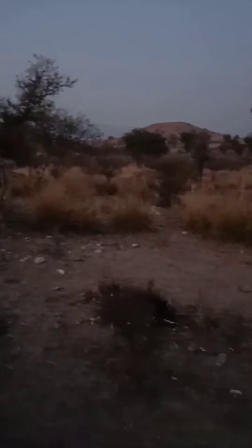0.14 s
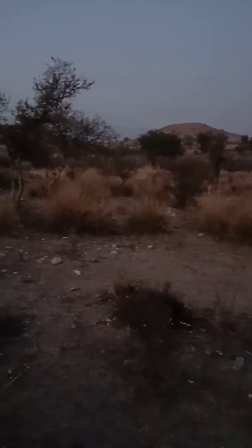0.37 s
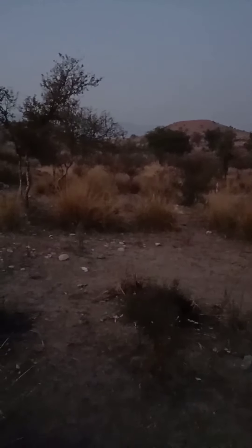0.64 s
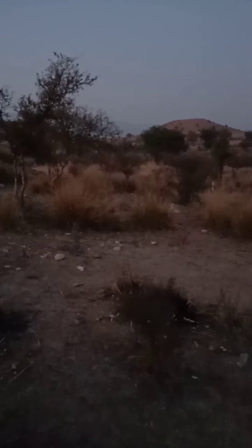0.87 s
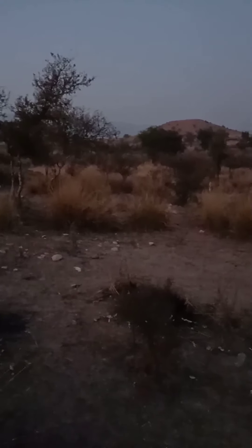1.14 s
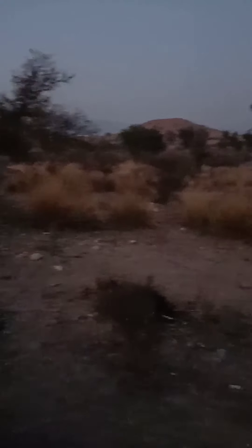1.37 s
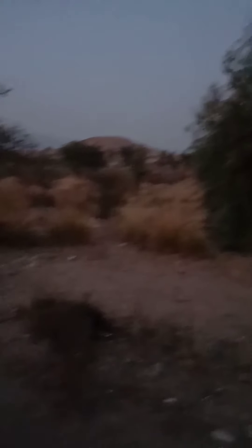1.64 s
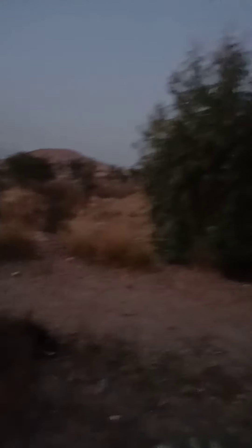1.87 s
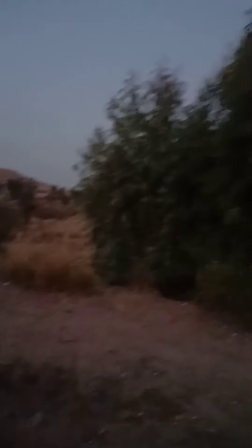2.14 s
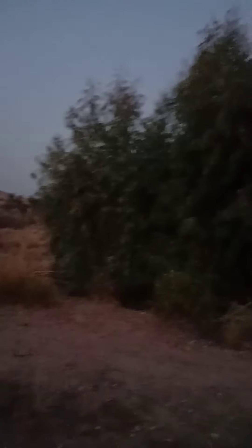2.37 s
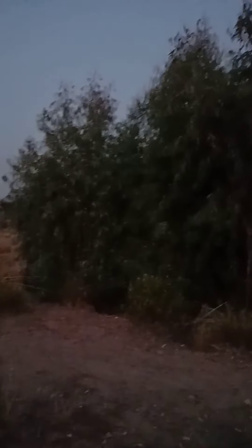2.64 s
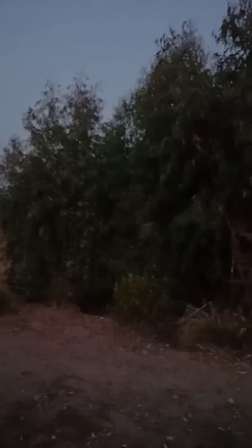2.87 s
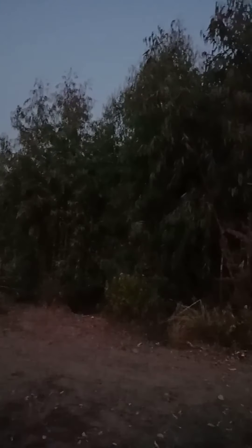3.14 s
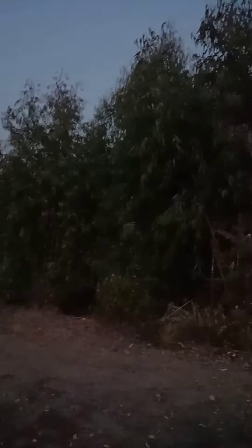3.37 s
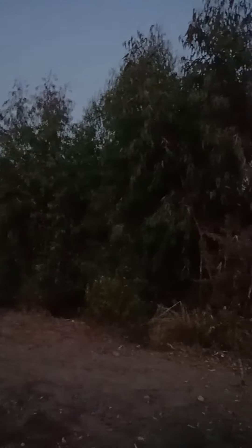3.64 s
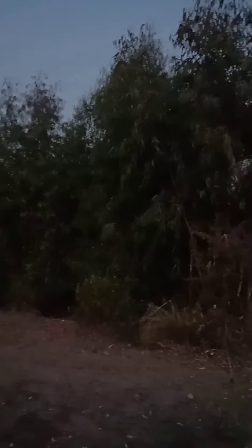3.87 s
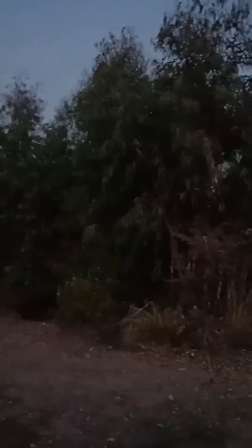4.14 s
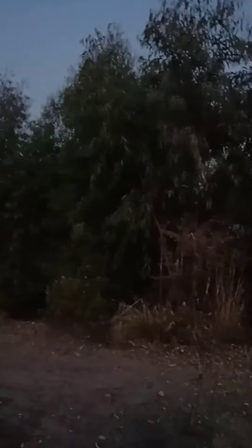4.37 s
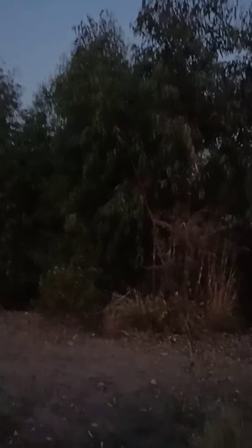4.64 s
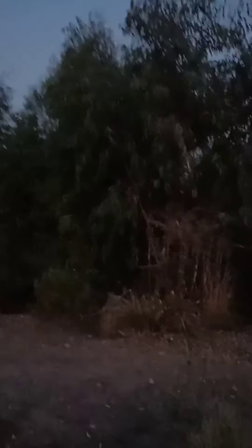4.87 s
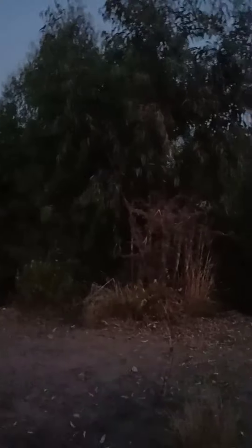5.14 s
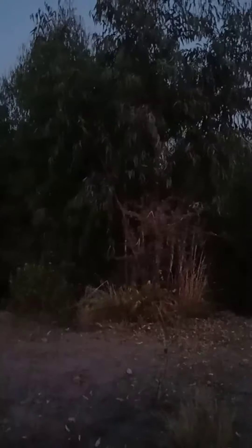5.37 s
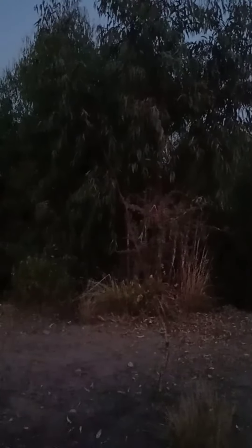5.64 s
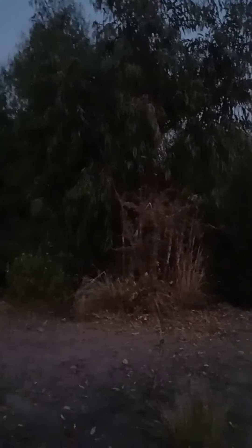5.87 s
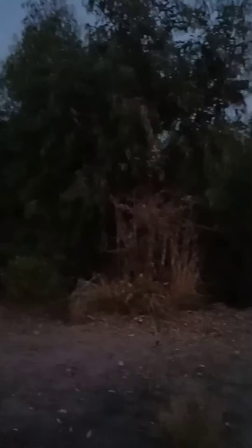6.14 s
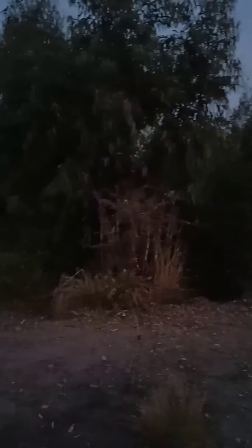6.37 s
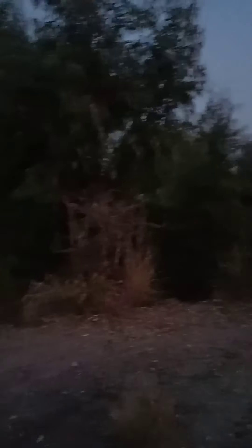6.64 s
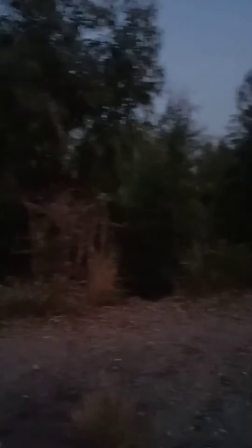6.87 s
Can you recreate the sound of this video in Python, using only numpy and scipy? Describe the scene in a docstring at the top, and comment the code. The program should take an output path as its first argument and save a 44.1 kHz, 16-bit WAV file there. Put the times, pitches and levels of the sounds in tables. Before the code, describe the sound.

A flock of small birds settles to roost in dense trees at dusk, all calling at once. From 0 to 1 second the chorus is lighter: a quick bright chirp near 0.3, a few short whistles, then a cluster around 0.9. From about 1.1 it thickens, with strong close notes around 1.8 and continuous overlapping chatter through 2 to 3.5 seconds. It is fullest from roughly 3.6 to 5, with sharp near chirps at 4.3 and 4.9 and more low raspy calls. After 5 it stays dense but slightly softer, with a last tight cluster of chirps near 6.7, ending mid-chorus at 7. Calls last only hundredths of a second, mostly gliding, slightly rough, mid-high to high pitched, smeared by short leaf echoes. A faint fuzzy tone, very quiet low air, early hand rustle and soft bumps near 1.5, 2.9 and 6.8 lie underneath.

```python
"""A flock of small birds gathers to roost in dense trees at dusk and calls all at once.
Near birds: listed gliding tones with rough overtones. Crowd: random chatter, cheeps and low rasps,
held to level curves. Foliage: sparse decaying echoes smear every call.
Below lie a faint drone (noise-modulated tone), still air and hand rustle (filtered noise), and
handling bumps (decaying low sines)."""
import sys
import numpy as np
from scipy import signal
from scipy.fft import rfft, irfft
from scipy.io import wavfile
from scipy.ndimage import uniform_filter1d

SR = 44100
rng = np.random.default_rng(int(sys.argv[2]) if len(sys.argv) > 2 else 0)


def gain_from_db(level_db):
    """Convert decibel levels to linear amplitude factors (20 dB per decade)."""
    decades = np.asarray(level_db, float) / 20
    return 10 ** decades


def waveform_to_disk(signal):
    """Save audio, clipped to [-1, 1], as 16-bit WAV at the path in sys.argv[1]."""
    frames = np.transpose(np.atleast_2d(signal))
    scaled = np.clip(frames, -1, 1) * 32767
    samples = np.round(scaled).astype(np.int16)
    wavfile.write(sys.argv[1], SR, samples)


N = 309141  # samples
TREES = 6  # each tree scatters sound its own way


def evened(x):
    """Scales to rms 1."""
    return x / np.sqrt(np.mean(x ** 2) + 1e-20)


def add(mix, start_s, sound):
    """Mixes a sound in at start_s, cut at the end of the mix."""
    part = mix[int(start_s * SR):][:len(sound)]
    part += sound[:len(part)]


def coloured(x, points):
    """Filters by a spectrum of (freq_hz, level_db) points, straight on a log-frequency axis."""
    freq_hz, level_db = np.transpose(points)
    bins_hz = np.fft.rfftfreq(len(x), 1 / SR)
    gain = gain_from_db(np.interp(np.log(bins_hz + 1), np.log(freq_hz), level_db))
    return irfft(rfft(x) * gain, len(x))


def wander(period_s):
    """Smoothed noise of rms 1 that changes over about period_s."""
    size = max(int(period_s * SR), 1)
    once = uniform_filter1d(rng.standard_normal(N), size)
    return evened(uniform_filter1d(once, size))


def loudness(table):
    """A (time_s, level_db) curve at every sample."""
    time_s, level_db = np.transpose(table)
    return np.interp(np.arange(N) / SR, time_s, level_db)


def bouts(table, rise_db_per_s, fall_db_per_s, floor_db):
    """Level in dB at every sample: each bout rises, holds and falls; bouts and floor add as power."""
    t = np.arange(0, N, 64)[:, None] / SR
    start_s, length_s, level_db = np.transpose(table)
    before_s = np.maximum(start_s - t, 0)
    after_s = np.maximum(t - start_s - length_s, 0)
    shape_db = level_db - rise_db_per_s * before_s - fall_db_per_s * after_s
    bout_power = (gain_from_db(shape_db) ** 2).sum(axis=1)
    power = np.interp(np.arange(N) / SR, t[:, 0], bout_power)
    return 10 * np.log10(power + gain_from_db(floor_db) ** 2)


def note(hz, flutter, rough, overtone_db, edge):
    """A syrinx tone along the pitch curve hz; flutter shakes its level, most of all in two overtones."""
    phase = 2 * np.pi * np.cumsum(hz) / SR
    second = gain_from_db(overtone_db) * np.sin(2 * phase)
    third = gain_from_db(1.453 * overtone_db) * np.sin(3 * phase)
    fundamental = np.sin(phase) * (1 + rough * flutter)
    tone = fundamental + (second + third) * (.35 + .95 * flutter[::-1])
    return tone * signal.windows.tukey(len(hz), np.clip(edge, 0, 1))


def foliage(x, t60_s, wet_db):
    """Direct sound plus leaf and trunk scatter: per tree (row), sparse decaying taps of random sign."""
    size = SR // 2
    at = np.arange(100, size - 20, 20)
    at = at + rng.integers(0, 20, (TREES, len(at)))
    taps = np.zeros((TREES, size))
    np.put_along_axis(taps, at, rng.choice([-1., 1.], at.shape), axis=1)
    taps *= gain_from_db(-60 * np.arange(size) / SR / t60_s)
    taps /= np.linalg.norm(taps[0])
    scatter = signal.oaconvolve(x, taps, axes=1)[:, :x.shape[1]]
    return (x + gain_from_db(wet_db) * scatter).sum(axis=0)


# nearest notes, level before waver and scatter: start_s, length_s, start_hz, end_hz, level_db
NEAR_NOTES = [(0.256, 0.054, 3225, 3700, -35.5), (0.286, 0.016, 6530, 6300, -38),
              (0.302, 0.0092, 6050, 4260, -43), (0.304, 0.028, 4090, 3360, -34),
              (0.392, 0.026, 3700, 2480, -48), (0.419, 0.034, 1810, 793, -59.5),
              (1.051, 0.035, 3720, 3590, -39.5), (0.536, 0.065, 4210, 3840, -43),
              (0.691, 0.11, 2666, 2850, -43.5), (0.774, 0.036, 6800, 3970, -40.5),
              (0.852, 0.042, 2820, 2435, -38), (0.878, 0.022, 4930, 6340, -41),
              (0.9, 0.017, 4520, 6220, -31.5), (0.915, 0.019, 5800, 3280, -38),
              (0.918, 0.031, 5800, 5570, -35.5), (0.95, 0.034, 3650, 3670, -33.5),
              (0.971, 0.036, 5440, 4400, -42), (1.109, 0.017, 5000, 6200, -38),
              (1.136, 0.035, 6500, 3800, -32), (1.199, 0.023, 4040, 2084, -41),
              (1.266, 0.095, 3390, 3274, -31.5), (1.378, 0.027, 4140, 5880, -40),
              (1.383, 0.032, 5400, 5690, -36.5), (1.422, 0.024, 6030, 4250, -32),
              (1.438, 0.032, 4260, 3830, -30), (1.536, 0.05, 5850, 6000, -36.5),
              (1.569, 0.031, 6350, 6500, -39.5), (1.575, 0.022, 3195, 2090, -37),
              (1.601, 0.026, 870, 807, -52.5), (1.699, 0.036, 3770, 5750, -37),
              (1.701, 0.056, 5460, 5140, -35.5), (1.783, 0.046, 3590, 3404, -33),
              (1.821, 0.037, 3310, 3280, -27), (1.843, 0.05, 3630, 3605, -29),
              (1.945, 0.018, 4600, 4600, -59), (1.993, 0.029, 5950, 5550, -33.5),
              (1.98, 0.014, 4000, 4570, -33.5), (2.008, 0.023, 3800, 3580, -29.5),
              (2.062, 0.02, 3700, 2400, -33.5), (2.081, 0.023, 3400, 2210, -42),
              (2.119, 0.012, 4050, 3840, -33), (2.133, 0.05, 2900, 2870, -35),
              (2.175, 0.012, 5460, 3220, -37), (2.184, 0.035, 3100, 2955, -29),
              (2.222, 0.037, 3020, 2444, -31), (2.267, 0.038, 2100, 1390, -43),
              (2.364, 0.019, 3800, 6500, -42), (2.398, 0.037, 2790, 2360, -37.5),
              (2.399, 0.018, 5620, 2860, -32), (2.451, 0.019, 2820, 2850, -29.5),
              (2.468, 0.077, 2580, 2890, -36), (2.586, 0.042, 3205, 3137, -29),
              (2.616, 0.092, 3550, 3196, -30), (2.696, 0.023, 4020, 3900, -42),
              (2.703, 0.056, 2252, 1945, -36), (2.722, 0.074, 3300, 3540, -36.5),
              (2.796, 0.028, 4060, 3650, -31.5), (2.87, 0.063, 2690, 2540, -36),
              (2.92, 0.054, 4420, 4460, -39.5), (2.944, 0.085, 2510, 2170, -42),
              (3.075, 0.011, 5000, 4500, -31.5), (3.101, 0.0098, 4930, 4620, -33.5),
              (3.086, 0.055, 3610, 3770, -32.5), (3.142, 0.034, 4390, 4120, -32),
              (3.175, 0.029, 1776, 770, -62), (3.347, 0.035, 5500, 5540, -39),
              (3.371, 0.1, 3180, 3120, -33.5), (3.477, 0.021, 1726, 945, -44.5),
              (3.531, 0.084, 2920, 3010, -34.5), (3.617, 0.0094, 5770, 4100, -31),
              (3.63, 0.018, 1470, 1260, -40.5), (3.625, 0.032, 4110, 3200, -28.5),
              (3.687, 0.013, 6100, 3570, -30), (3.872, 0.072, 5600, 5500, -37.5),
              (3.891, 0.048, 3700, 3540, -32), (4.077, 0.06, 3400, 3610, -29),
              (4.132, 0.039, 3260, 3270, -35), (4.216, 0.027, 2476, 2560, -27.5),
              (4.295, 0.031, 2150, 1930, -62), (4.204, 0.063, 5150, 5450, -42),
              (4.301, 0.028, 5570, 6970, -40), (4.304, 0.031, 4190, 3820, -30.5),
              (4.317, 0.032, 3470, 3840, -25), (4.351, 0.025, 2520, 2400, -31),
              (4.354, 0.032, 3580, 3720, -38), (4.455, 0.059, 2550, 2450, -33.5),
              (4.534, 0.11, 2777, 2870, -35), (4.602, 0.042, 3430, 3620, -27),
              (4.781, 0.024, 4500, 4410, -32), (4.864, 0.015, 4180, 6400, -33.5),
              (4.877, 0.036, 6500, 5740, -37), (4.897, 0.013, 5620, 3370, -24),
              (4.898, 0.038, 4170, 3455, -29.5), (5.045, 0.054, 3330, 3160, -32),
              (5.161, 0.025, 1757, 1036, -46.5), (5.249, 0.016, 2480, 2770, -33),
              (4.654, 0.036, 2400, 2160, -37), (5.369, 0.054, 2605, 2635, -33),
              (5.396, 0.075, 2037, 1820, -43), (5.482, 0.067, 2550, 2840, -38.5),
              (5.552, 0.034, 3880, 3656, -29), (5.596, 0.028, 3760, 2820, -32),
              (5.769, 0.02, 3900, 4500, -37.5), (5.784, 0.016, 4500, 3730, -33),
              (5.794, 0.06, 2650, 2316, -36.5), (5.858, 0.084, 3116, 3260, -34),
              (6.017, 0.086, 2586, 2376, -34), (6.168, 0.018, 3695, 3365, -29.5),
              (6.218, 0.06, 2050, 1840, -39), (6.38, 0.085, 7250, 7070, -46), (6.483, 0.1, 3170, 3255, -35),
              (6.707, 0.010, 5700, 3460, -30), (6.717, 0.013, 3600, 3130, -29),
              (6.727, .008, 5070, 3600, -33), (6.735, 0.049, 2900, 3150, -31.5),
              (6.784, 0.044, 2500, 1950, -40.5), (6.876, 0.01, 4400, 3630, -35.5)]


def near_birds():
    """Notes that stand out: rough tones gliding from one pitch to another, fastest at first if wide."""
    waver_db = 3.2
    out = np.zeros((TREES, N))
    flutter, quaver = wander(0.00067), wander(0.0051)
    throb = wander(0.0043)  # slow level flutter: long notes waver in beads
    for k, (start_s, length_s, start_hz, end_hz, level_db) in enumerate(NEAR_NOTES):
        u = np.linspace(0, 1, int(length_s * SR))
        first = int(start_s * SR)
        span = slice(first, first + len(u))
        ratio = end_hz / start_hz
        steep = min(abs(np.log(ratio)) / .4, 1)  # wide sweeps are harsher than level whistles
        shake = .009 * quaver[span] + .015 * steep * flutter[span][::-1]
        hz = start_hz * ratio ** (u ** (1 - .4 * steep)) * (1 + shake)
        sound = note(hz, flutter[span], rough=0.21 + 0.05 * steep,
                     overtone_db=-24 - 12 * steep, edge=0.16)
        wavering_db = level_db + waver_db * np.clip(throb[span], -3, 1)
        add(out[k % TREES], start_s, np.sqrt(2) * gain_from_db(wavering_db) * sound)  # sqrt(2): level as sine rms
    return foliage(out, t60_s=0.15, wet_db=-6)


# overall colour of the crowd, with a dip near 8 kHz: freq_hz, level_db
CROWD_COLOUR = [(300, -70), (550, -13.5), (900, -22), (1500, -7.5), (2500, -3), (3700, 1), (4600, 1.5),
                (6000, 0), (7400, -3.5), (8100, -15), (10500, -6.5), (12500, -16.5), (13800, -21),
                (15000, -13.5)]


def crowd(count, low_hz, high_hz, length_s, fall, arch, rough, overtone_db, spread_db):
    """Many birds at chance moments: calls arch in pitch, and most fall; fall and arch are log ratios."""
    hoarse = .009  # share by which the pitch shakes
    lead = SR // 4  # samples: the flock is already calling when the scene opens
    out = np.zeros((TREES, N + SR))
    flutter = np.tile(wander(.0013), 2)
    for when, pitch, long, drop, bow, far, own in rng.random((count, 7)):
        u = np.linspace(0, 1, int(length_s * (.4 + 1.6 * long ** 2) * SR))
        arching = arch * bow * (np.sin(np.pi * u) - .5)
        falling = fall * (1.6 * drop ** 2 - .2) * (u - .5)
        shaking = flutter[int(own * N):][:len(u)]
        centre_hz = low_hz * (high_hz / low_hz) ** pitch
        hz = centre_hz * np.exp(arching - falling + hoarse * shaking[::-1])
        call = gain_from_db(-spread_db * far) * note(hz, shaking, rough, overtone_db, edge=.5)
        add(out[int(own * N) % TREES], when * (N + lead) / SR, call)
    return coloured(foliage(out, t60_s=.15, wet_db=-2)[lead:lead + N], CROWD_COLOUR)


def following(x, level_db):
    """Evens out a crowd's loudness, then sets it to a level curve."""
    power = uniform_filter1d(uniform_filter1d(x ** 2, 3000), 3000)
    return x / np.sqrt(power + 1e-12) * gain_from_db(level_db)


# far part of the roost, heard in the pauses, before each part's share: time_s, level_db
MURMUR_LEVEL = [(0, -43), (.7, -39), (1.3, -34.5), (1.65, -40.5), (2.3, -45), (2.6, -34.5), (3.2, -32),
                (4.2, -34.5), (5.2, -30), (5.7, -34.5), (6.2, -35), (7.01, -32)]


def part_level(table, rise_db_per_s, fall_db_per_s, share_db):
    """Level in dB of one part of the flock: nearer birds' bouts over its share of the murmur."""
    return bouts(table, rise_db_per_s, fall_db_per_s, loudness(MURMUR_LEVEL) + share_db)


# chatter colour, weak between about 4.5 and 6.2 kHz: freq_hz, level_db
CHATTER_COLOUR = [(3700, 0), (4300, -7), (4900, -24), (6100, -24), (6600, 0)]
# bouts of nearer chatterers: start_s, length_s, level_db
CHATTER = [(.24, 0.012, -36.5), (.38, 0.016, -34.5), (.8, 0.027, -33.5), (1.13, 0.13, -35),
           (1.46, 0.15, -30), (1.74, 0.079, -26.5), (2.02, 0.097, -32), (2.18, 0.091, -32.5),
           (2.37, 0.093, -37.5), (2.57, 0.16, -34), (2.85, 0.019, -29.5), (3.1, 0.089, -30),
           (3.42, 0.067, -27.5), (3.55, 0.32, -30), (3.94, 0.23, -27), (4.32, 0.49, -27.5),
           (4.92, 0.027, -27), (5.0, 0.37, -33), (5.52, 0.025, -31), (5.85, 0.18, -33.5),
           (6.4, 0.13, -35.5), (6.72, 0.042, -42)]


def chatter():
    """Mid-pitched calls, weak between about 4.5 and 6.2 kHz."""
    calls = crowd(count=1600, low_hz=2000, high_hz=4000, length_s=.027, fall=.65, arch=.18,
                  rough=.55, overtone_db=-17, spread_db=13)
    level_db = part_level(CHATTER, rise_db_per_s=250, fall_db_per_s=200, share_db=-0.11)
    return following(coloured(calls, CHATTER_COLOUR), level_db)


# bouts of nearer cheepers, level before the overtone change: start_s, length_s, level_db
CHEEPS = [(.11, 0.027, -49), (.3, 0.039, -38.5), (.51, 0.046, -44), (.73, 0.093, -42.5),
          (.93, 0.029, -37.5), (1.14, 0.069, -37), (1.24, 0.092, -39.5), (1.44, 0.15, -35.5),
          (1.74, 0.073, -34.5), (2.02, 0.031, -36.5), (2.18, 0.073, -40.5), (2.41, 0.014, -36),
          (2.57, 0.13, -37.5), (2.79, 0.17, -36), (3.1, 0.048, -35), (3.36, 0.31, -36.5),
          (3.62, 0.095, -33.5), (3.75, 0.11, -37.5), (3.94, 0.21, -38), (4.19, 0.032, -46),
          (4.33, 0.026, -34.5), (4.49, 0.22, -35.5), (4.83, 0.061, -39.5), (4.91, 0.0081, -32),
          (5.1, 0.19, -45), (5.28, 0.075, -37), (5.48, 0.067, -38.5), (5.75, 0.21, -39),
          (6.15, 0.045, -42.5), (6.44, 0.15, -38.5), (6.72, 0.0057, -36.5), (6.9, 0.17, -50)]


def cheeps():
    """High swept calls; loud ones are near or forceful, so overtones outgrow the fundamental."""
    calls = crowd(count=1700, low_hz=4100, high_hz=7200, length_s=.024, fall=.6, arch=.22,
                  rough=.55, overtone_db=-10, spread_db=13)
    level_db = part_level(CHEEPS, rise_db_per_s=230, fall_db_per_s=203, share_db=-14)
    calls = following(calls, level_db)
    overtones = coloured(calls, [(7600, -80), (8400, 0)])
    return calls + overtones * (gain_from_db(0.79 * (level_db + 34.5)) - 1)


# bouts of nearer raspers: start_s, length_s, level_db
RASPS = [(.24, 0.079, -54.5), (.45, 0.0045, -47), (.62, 0.035, -50.5), (.86, 0.024, -45), (1.14, 0.27, -50),
         (1.4, 0.005, -48), (1.49, 0.071, -47), (1.66, 0.018, -44), (1.81, 0.084, -47), (2.11, 0.02, -48.5),
         (2.42, 0.064, -44), (2.67, 0.023, -43.5), (2.85, 0.1, -51), (3.17, 0.07, -48), (3.43, 0.23, -57),
         (3.82, 0.048, -40), (4.11, 0.067, -39), (4.4, 0.053, -39), (4.6, 0.086, -40), (4.85, 0.24, -49),
         (5.15, .28, -57), (5.52, 0.097, -48), (5.74, 0.0075, -46), (5.98, 0.016, -47), (6.59, 0.12, -52.5),
         (6.99, .02, -52)]


def rasps():
    """Low, mostly falling calls with moderate roughness."""
    calls = crowd(count=650, low_hz=750, high_hz=1950, length_s=.036, fall=.8, arch=.13,
                  rough=.3, overtone_db=-14, spread_db=13)
    level_db = part_level(RASPS, rise_db_per_s=250, fall_db_per_s=370, share_db=-19)
    return following(calls, level_db)


# usual level of the drone: time_s, level_db
DRONE_USUAL = [(0.0, -73), (0.54, -60.5), (1.7, -61.5), (3.8, -55), (5.1, -60), (7.01, -53)]
# swells of the drone: start_s, length_s, level_db
DRONE_BOUTS = [(1.82, 0.017, -46), (2.035, 0.075, -47), (4.38, 0.14, -47.5), (4.94, 0.081, -44.5),
               (6.06, 0.1, -52.5)]


def drone():
    """A faint fuzzy tone that comes and goes: low-passed noise on both quadratures of a carrier."""
    pitch_hz, width_hz = 1255, 90
    r = np.exp(-np.pi * width_hz / SR)
    fuzz = rng.standard_normal((2, N))
    for _ in range(2):  # twice for steep skirts
        fuzz = signal.lfilter([1 - r], [1, -r], fuzz)
    phase = 2 * np.pi * pitch_hz * np.arange(N) / SR
    tone = evened(fuzz[0] * np.cos(phase) + fuzz[1] * np.sin(phase))
    level_db = bouts(DRONE_BOUTS, rise_db_per_s=2200, fall_db_per_s=400,
                     floor_db=loudness(DRONE_USUAL))
    return gain_from_db(level_db) * tone


# relative spectrum of the air: freq_hz, level_db
AIR_COLOUR = [(24, -42), (40, -26), (54, -11), (118, 0), (195, -8.5), (291, -8), (371, -10.5), (650, -6.5),
              (840, -46), (1430, -120)]


def air():
    """Steady low outdoor rumble: noise filtered to a fixed spectrum."""
    level_db = -73
    return gain_from_db(level_db) * evened(coloured(rng.standard_normal(N), AIR_COLOUR))


# relative spectrum of the rustle: freq_hz, level_db
RUSTLE_COLOUR = [(60, -12), (150, -10), (230, -3), (330, -7), (550, -8.5), (900, -31)]
# centre level of the rustle, before lumps: time_s, level_db
RUSTLE_LEVEL = [(0, -78.5), (.8, -73), (1.8, -76.5), (2.5, -71), (3.1, -75), (3.5, -101), (7.01, -102)]


def rustle():
    """Lumpy rustle of the hand: filtered noise whose level wanders in dB."""
    noise = evened(coloured(rng.standard_normal(N), RUSTLE_COLOUR))
    return gain_from_db(loudness(RUSTLE_LEVEL) + 4.2 * wander(0.024)) * noise


# bumps of the hand, nominal peak (envelope peaks about 1 dB higher): start_s, level_db, ring_hz
HAND_BUMPS = [(1.461, -49.5, 183), (2.851, -56, 204), (3.175, -61, 86.1), (6.76, -53, 100)]


def bumps():
    """Each handling bump is a short low body ring: a sine that swells, then decays."""
    out, t = np.zeros(N), np.arange(SR // 10) / SR
    envelope = 3.4 * (t / 0.0059) * np.exp(-t / 0.0053)
    for start_s, level_db, ring_hz in HAND_BUMPS:
        add(out, start_s, gain_from_db(level_db) * envelope * np.sin(2 * np.pi * ring_hz * t))
    return out


def scene():
    """All sources at one microphone."""
    flock = chatter() + cheeps() + rasps()
    return (near_birds() + flock + drone() + air() + rustle() + bumps())[None]


def band_limit(x):
    """A steep low-pass at the top of the band."""
    return signal.sosfilt(signal.butter(12, 15525, fs=SR, output="sos"), x)


def record(dry):
    """Turns the dry scene into the finished sound."""
    return band_limit(dry)


dry = scene()
out = record(dry)
waveform_to_disk(out)
```